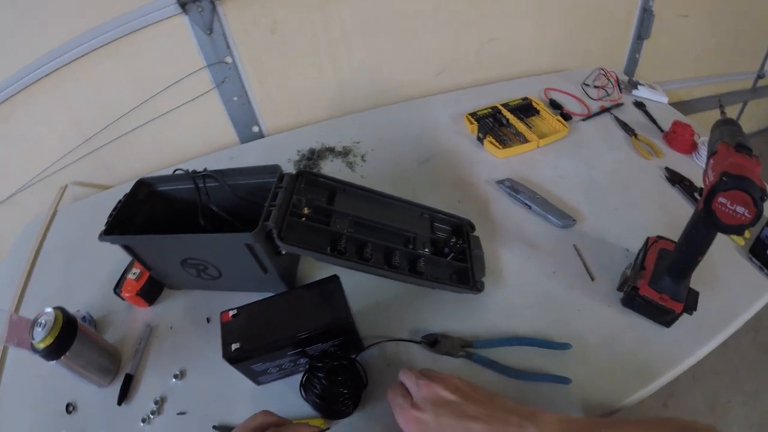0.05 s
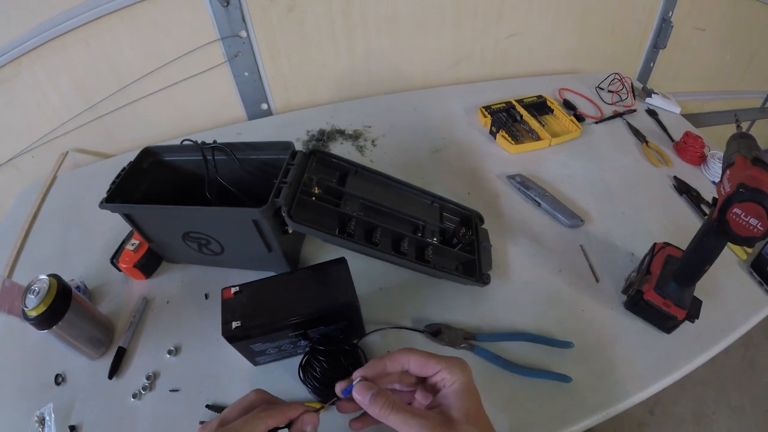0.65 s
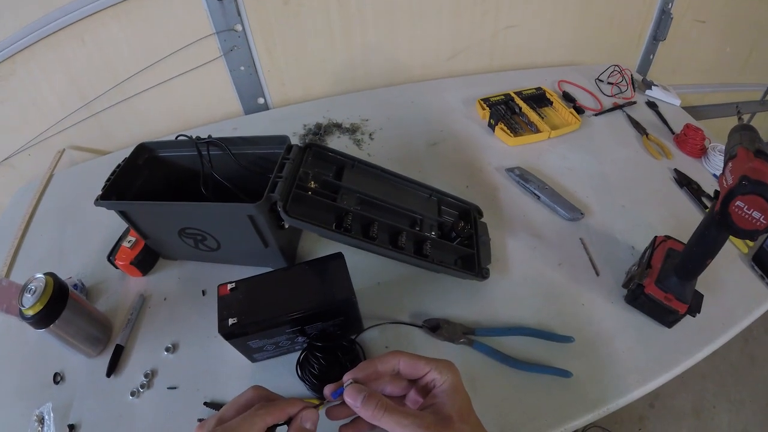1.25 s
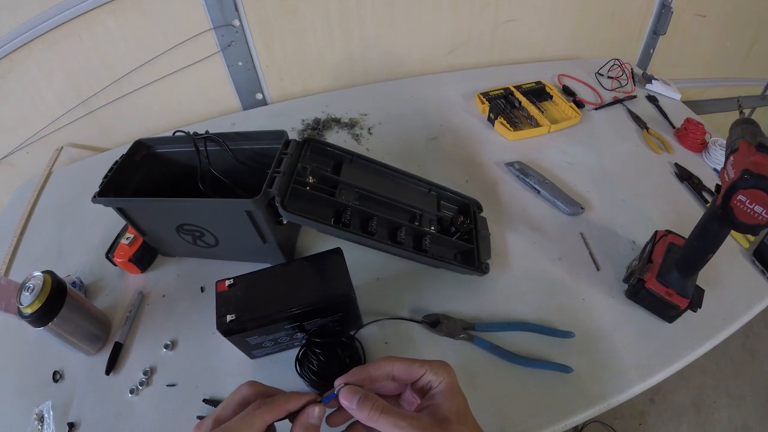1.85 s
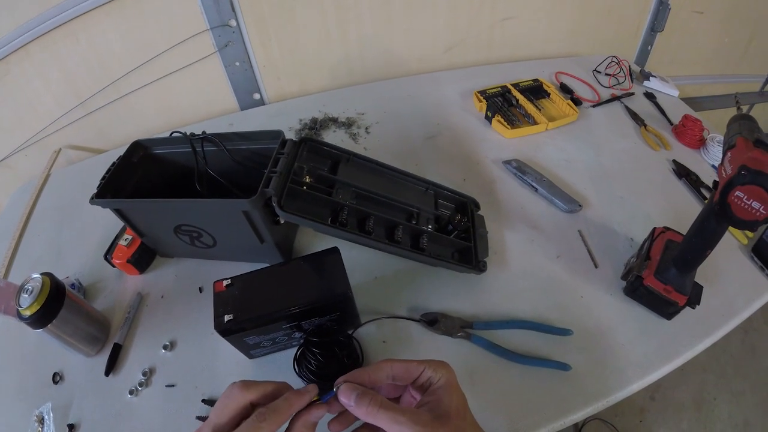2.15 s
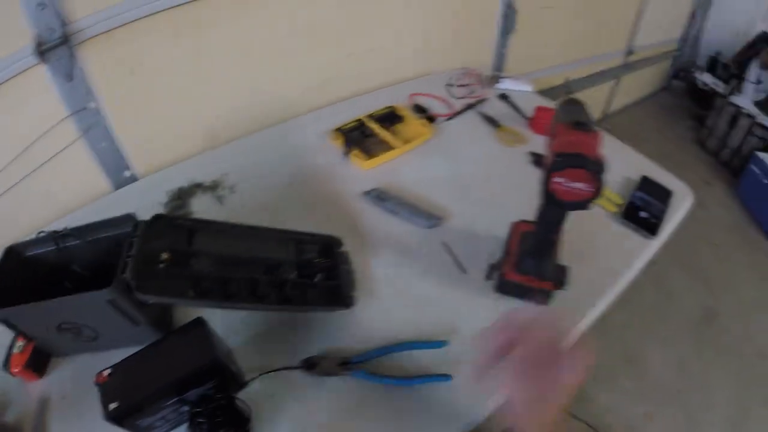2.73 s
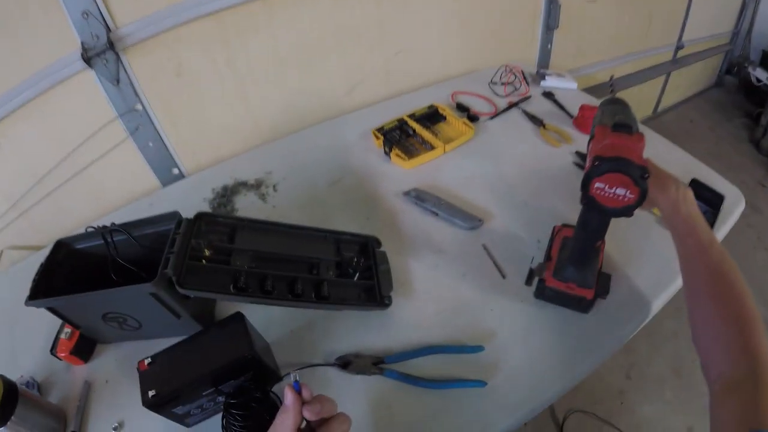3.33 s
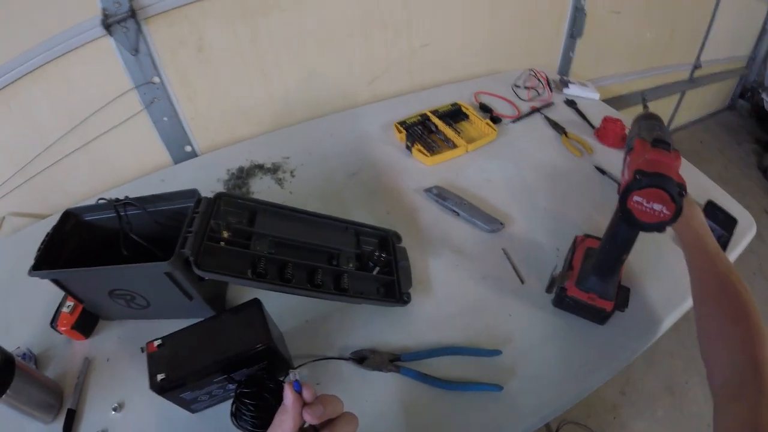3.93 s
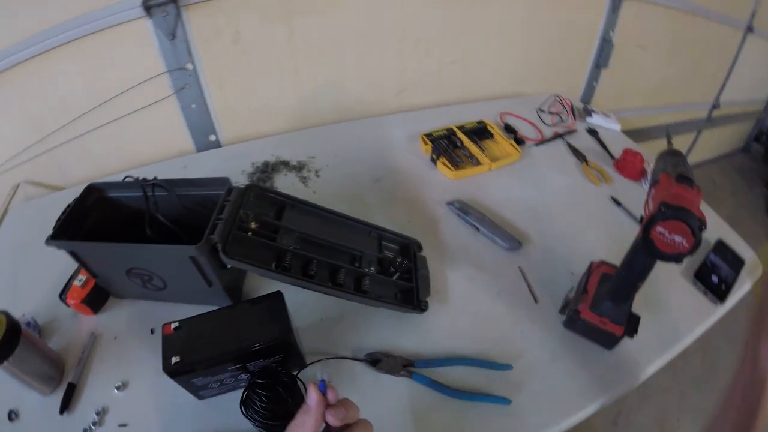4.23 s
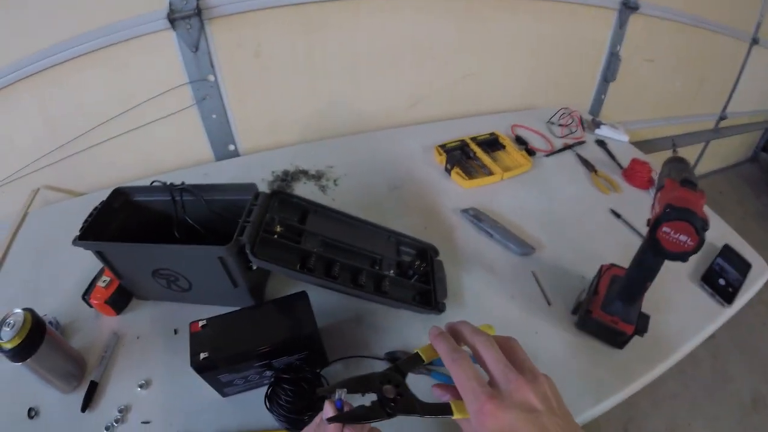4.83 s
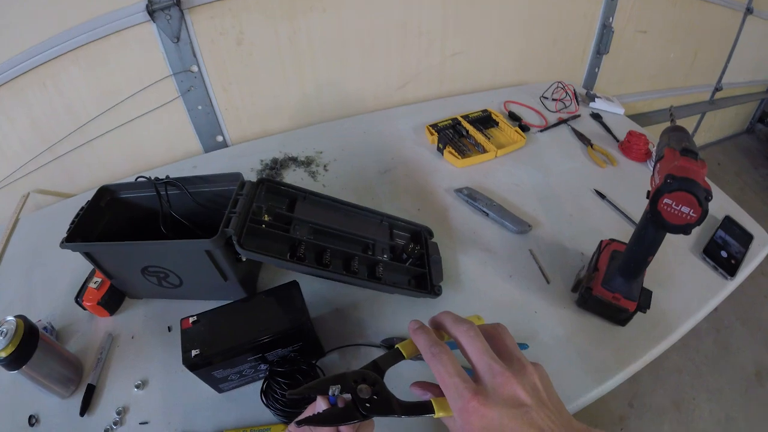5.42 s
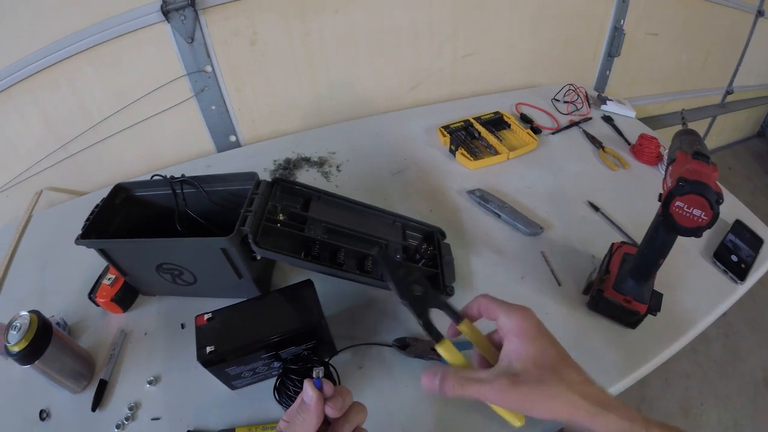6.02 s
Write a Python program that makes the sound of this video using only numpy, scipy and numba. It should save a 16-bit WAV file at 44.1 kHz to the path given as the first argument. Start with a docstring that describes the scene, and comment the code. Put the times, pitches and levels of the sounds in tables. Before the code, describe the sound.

A fan motor hums low and steady in a garage, with a soft rush of air. About halfway through, a hand bumps a plastic table and pliers are dragged out with short scrapes and small metal ticks. Something hard clacks down and rattles quickly to rest, with a slight room echo. Near the end come faint scraping and a sharp click as the pliers snap open close to the microphone.

```python
"""A fan motor hums steadily in a garage, with a rush of air. At a plastic folding table, a hand bumps
the top and drags out a pair of crimping pliers, which scrape by stick-slip friction. Something hard
clacks down, exciting the modes of the top, and rattles to rest while the room reverberates.
The steel pliers tick once on the way back and snap open after squeezing a terminal."""
import sys
import numpy as np
from scipy import signal
from scipy.fft import rfft, irfft
from scipy.io import wavfile
from scipy.ndimage import uniform_filter1d
from numba import njit

SR = 44100
rng = np.random.default_rng(int(sys.argv[2]) if len(sys.argv) > 2 else 0)


def put_to_file(sound):
    """Save the sound as 16-bit audio at rate SR, in the file named by the first command-line argument."""
    columns = np.atleast_2d(sound).T  # one column per channel
    safe = np.clip(columns, -1, 1)
    whole_steps = np.round(safe * 32767)
    wavfile.write(sys.argv[1], SR, whole_steps.astype(np.int16))


N = 272083
TIME = np.arange(N) / SR
RING_TIME = TIME[:SR // 2]


def gain(db):
    """Decibels to amplitude ratio."""
    return 10 ** (np.asarray(db) / 20)


def unit_rms(x):
    """Scale to rms 1."""
    return x / np.sqrt(np.mean(x ** 2))


def lookup(hz, points):
    """Interpolate (Hz, value) points on a log-frequency axis."""
    point_hz, value = np.transpose(points)
    return np.interp(np.log(np.maximum(hz, 1)), np.log(point_hz), value)


def colour(x, points, size=4096):
    """Minimum-phase filter with the given (Hz, dB) response, built by folding its cepstrum."""
    cepstrum = irfft(np.log(gain(lookup(np.fft.rfftfreq(size, 1 / SR), points))))
    cepstrum[1:size // 2] *= 2
    cepstrum[size // 2 + 1:] = 0
    return signal.fftconvolve(x, irfft(np.exp(rfft(cepstrum))))[:len(x)]


def tilt(x, db_per_octave):
    """Spectral slope about 1 kHz."""
    return colour(x, [(hz, db_per_octave * np.log2(hz / 1000)) for hz in (250, 16000)])


@njit
def resonate(x, hz, q):
    """Second-order band-pass resonator whose centre may move every sample."""
    y, band, low = np.empty(len(x)), 0., 0.
    for i in range(len(x)):
        g = np.tan(np.pi * hz[i] / SR)
        v = (band + g * (x[i] - low)) / (1 + g * (g + 1 / q))
        band, low, y[i] = 2 * v - band, low + 2 * g * v, v / q
    return y


def waver(rate_hz):
    """Slow random modulation of rms 1: steps smoothed twice."""
    hold = int(SR / rate_hz)
    steps = np.repeat(rng.standard_normal(N // hold + 1), hold)
    return unit_rms(uniform_filter1d(uniform_filter1d(steps, hold), hold)[:N])


def decay(t60):
    """Exponential damping, 60 dB down after t60 seconds."""
    return np.exp(-np.log(1000) * RING_TIME / t60)


def ring(modes, pitch=1):
    """Modal superposition: each blow lands elsewhere and weights the damped modes differently."""
    hz, db, t60 = np.transpose(modes)
    weights = gain(db + rng.standard_normal(len(hz))) * rng.choice([-1, 1], len(hz))
    partials = (a * np.sin(2 * np.pi * f * pitch * RING_TIME) * decay(t)
                for f, a, t in zip(hz, weights, t60))
    return sum(partials) / np.linalg.norm(weights)


def crack(spectrum, t60):
    """Modal overlap: dense, quickly dying modes merge into a noise burst of set energy."""
    phase = np.angle(rfft(rng.standard_normal(len(RING_TIME)) * decay(t60)))
    flat = irfft(np.exp(1j * phase), len(RING_TIME))
    burst = colour(flat * decay(10 * t60), spectrum)
    return burst * np.linalg.norm(decay(t60)) / np.linalg.norm(burst)


def add(track, start_s, sound):
    """Mix a sound into the track."""
    start = int(start_s * SR)
    track[start:start + len(sound)] += sound[:N - start]


# Motor hum. Each row: multiple of the shaft rate, rms level in dB, waver in dB.
SHAFT_HARMONICS = [(1, -22.5, 0.28), (2, -41, 1.5), (3, -53, 1.1), (4, -43.5, 0.8), (6, -68.5, 3.6)]
# Rushing air. Each row: frequency in Hz, relative spectral density in dB.
AIR_SPECTRUM = [(25, 2.5), (70, -1), (130, -4.5), (210, -6), (300, -11), (550, -14), (700, -19),
                (950, -17.5), (1300, -23), (2100, -28.5), (3800, -30.5), (4600, -50), (15000, -82)]

def fan(shaft_hz=57.84, panel_hz=251.7, panel_db=-53, air_db=-40, flutter_db=.5):
    """Periodic rotation gives harmonics of the shaft rate, over a droning panel and broadband air."""
    turns = shaft_hz * TIME + 0.0019 * waver(8.5)
    hum = sum(gain(db + waver_db * waver(8.4)) * np.sin(2 * np.pi * (multiple * turns + rng.random()))
              for multiple, db, waver_db in SHAFT_HARMONICS)
    panel_phase = 2 * np.pi * panel_hz * TIME
    panel = waver(9) * np.sin(panel_phase) + waver(8) * np.cos(panel_phase)
    air = unit_rms(colour(rng.standard_normal(N), AIR_SPECTRUM))
    air *= gain(air_db + flutter_db * waver(8.6))
    return np.sqrt(2) * hum + gain(panel_db) * panel + air


# Decay of the room. Each row: frequency in Hz, reverberation time in seconds.
GARAGE_T60 = [(120, 0.9), (500, 0.5), (1200, 0.69), (3000, 0.54), (5500, 0.57), (12000, 0.32)]
# Colour of the echoes. Each row: frequency in Hz, gain in dB.
GARAGE_SPECTRUM = [(100, -18), (170, 3), (270, -1), (480, 4.5), (750, 0.5), (1200, -3.5), (2200, -2),
                   (3500, 0.5), (4700, -5), (6300, -0.5), (10500, 1), (13000, 2)]

def garage(x, wet_db=-37, build_s=0.0025):
    """Diffuse reverberation: echoes build up from the nearest walls, and the treble dies first."""
    n = len(RING_TIME)
    hz = np.fft.rfftfreq(n, 1 / SR)
    spectrum = rfft(rng.standard_normal(n)) * gain(lookup(hz, GARAGE_SPECTRUM))
    octave = np.round(np.log2(np.maximum(hz, 64)))
    tail = sum(irfft(spectrum * (octave == k), n) * decay(lookup(2 ** k, GARAGE_T60))
               for k in np.unique(octave))
    build_up = 1 - np.exp(-(RING_TIME / build_s) ** 2)
    return gain(wet_db) * signal.fftconvolve(x, tail * build_up)[:N]


# Sliding contacts. Each row: start in seconds, length in seconds, nominal level in dB,
# slope in dB per octave, first and last contact resonance in Hz.
SLIDE_STROKES = [(3.119, 0.018, -47, 1, 1100, 1900), (3.132, 0.058, -50, -1.5, 400, 600),
                 (3.237, 0.055, -37.5, -4.5, 1500, 1680), (3.56, 0.069, -38.5, -11.5, 300, 300),
                 (3.836, 0.041, -41.5, -0.5, 1690, 750), (5.392, 0.52, -54, -4.5, 910, 1400),
                 (5.484, 0.18, -50, -4, 950, 1250), (5.961, 0.14, -51.5, -5, 900, 1200)]
# Colour of the friction. Each row: frequency in Hz, relative level in dB.
FRICTION_SPECTRUM = [(250, -22.5), (600, -10), (850, -6.5), (1100, -0.5), (1400, -4.5), (1850, -5),
                     (2250, -14), (3800, -14.5), (5000, -34), (14000, -51)]

def slides(slips_per_s=2000, scatter_db=5, uneven_db=2, contact_q=1.7, contact_db=-4):
    """Stick-slip friction: uneven catches drive a resonance that glides as the contact moves."""
    out = np.zeros(N)
    for start_s, length_s, db, slope, start_hz, end_hz in SLIDE_STROKES:
        n = int(length_s * SR)
        catches = (rng.random(N) < slips_per_s / SR) * rng.choice([-1, 1], N)
        catches = catches * gain(scatter_db * rng.standard_normal(N))
        scrape = unit_rms(tilt(colour(catches[:n], FRICTION_SPECTRUM), slope))
        contact = unit_rms(resonate(scrape, np.geomspace(start_hz, end_hz, n), contact_q))
        pressure = np.hanning(n) ** 0.13
        add(out, start_s, gain(db) * unit_rms(scrape + gain(contact_db) * contact) * pressure)
    return out * gain(uneven_db * waver(40))


SNAP_DB = -20  # strength of a full snap of the pliers
# Steel jaws and pivot. Each row: frequency in Hz, relative level in dB, t60 in seconds.
PIVOT_MODES = [(844, -13, 0.048), (1364, -8, 0.064), (3373, -9, .012), (3230, -21, 0.011),
               (3681, -28, 0.0197), (4000, -2, 0.021), (6450, -19, 0.014), (6200, -2.5, 0.01),
               (7800, 1, 0.012), (10070, -17, 0.0127), (10400, -1, 0.012)]
# Crack of steel on steel. Each row: frequency in Hz, relative spectral density in dB.
PIVOT_CRACK = [(1200, -9.5), (2600, -5.5), (3400, 10), (4200, -6.5), (5200, -13), (6300, 1), (7700, -6),
               (9000, -9), (12500, -8), (15000, -35)]

def pivot(db, crack_db=-4.5, ring_db=-6, slope_per_db=0.524):
    """Damped impact: a harder contact is brighter, and the gripping hand soon absorbs the ringing."""
    slope = slope_per_db * min(db - SNAP_DB, 0)
    tick = gain(ring_db) * ring(PIVOT_MODES) + gain(crack_db) * crack(PIVOT_CRACK, t60=0.021)
    return gain(db - 2 * slope) * tilt(tick, slope)  # the slope turns about 4 kHz


# Jaw tips and opening spring. Each row: frequency in Hz, relative level in dB, t60 in seconds.
TIP_MODES = [(5180, -1, 0.019), (6300, 2, 0.014), (9960, -5.5, 0.017)]
OPENING_SPRING_MODES = [(3160, -2, .2), (3480, -6, .22), (3520, -5, .22), (3700, 4, 0.26), (4000, -3, 0.22)]
# Ticks of the pliers. Each row: start in seconds, strength in dB, jaw tips' share from 0 to 1.
PLIER_TICKS = [(3.536, -37.5, 0.37), (3.559, -30.5, 0.47), (3.612, -31.5, 0.06), (3.633, -28.5, 0.1),
               (4.589, -31, 0.82), (5.863, -21, 0.26)]

def pliers(spring_db=-26, rebound_s=.009, rebound_db=-8):
    """Mechanical play: a tick rings tips, pivot and spring, then the loose pivot rebounds once."""
    out = np.zeros(N)
    for start_s, db, tip_share in PLIER_TICKS:
        joint = pivot(db) + gain(db + spring_db) * ring(OPENING_SPRING_MODES)
        tips = gain(db) * ring(TIP_MODES) / 2
        add(out, start_s, (1 - tip_share) * joint + tip_share * tips)
        delay_s = rebound_s * gain(db - SNAP_DB) ** 0.45  # weaker ticks return sooner
        add(out, start_s + delay_s, (1 - tip_share) * gain(rebound_db) * pivot(db))
    return out


# Hard ring and slow bending of the top. Each row: frequency in Hz, relative level in dB, t60 in seconds.
TOP_RING_MODES = [(760, -13.5, 0.12), (1055, -16, 0.09), (1172, 3, 0.043), (1267, -4, 0.028),
                  (1410, -11, 0.07), (1486, -6, 0.035), (1770, -8, 0.03), (2130, -8.5, 0.026),
                  (2406, -6.5, 0.03), (2700, -6, 0.027), (3370, -6, 0.022), (3720, -11, 0.022),
                  (4250, -9, .02), (6230, -18, 0.018)]
TOP_BENDING_MODES = [(130, 4.5, 0.19), (152.5, -4.5, 0.17), (200, -13, 0.078), (263.5, -2, 0.16),
                     (300, -3.5, 0.08), (396, -3, 0.057), (482, -13, 0.066), (565, -10, 0.046),
                     (690, -9.5, 0.059)]
# Brief crack of the top. Each row: frequency in Hz, relative spectral density in dB.
TOP_CRACK = [(300, -23), (430, -11), (580, -20), (780, -38), (930, -12), (1200, 4), (1600, 7), (2100, 3.5),
             (2700, -2.5), (3050, -3), (3400, -2), (4300, -2.5), (5100, -11), (6300, -10.5), (8200, -30),
             (12000, -29), (15000, -54)]
# Blows on the top. Each row: start in seconds, clack strength in dB, hardness from 0 (palm) to
# 1 (bare edge), clack pitch factor, bending strength in dB, bending pitch factor.
TABLE_BLOWS = [(3.127, -37, .15, .9, -14.5, 1.1), (3.162, -34, 0.17, 0.5, -21, 1.1),
               (3.559, -30, 1, 0.95, -23, 1), (3.629, -7.5, 0.57, 1, -9.5, 1),
               (3.658, -18, 0.28, 1.1, -27, .95), (3.667, -21, 0.23, 0.89, -35, 1),
               (3.724, -34, .3, 1.06, -44, 1), (3.774, -28, 0.3, 0.92, -41, 1), (3.828, -34, .3, 1, -48, 1)]

def table(crack_db=-8, ring_db=-1, thud_db=-3, flex_s=0.0043, full_hardness=0.574, soft_slope=-9):
    """Impact excitation: the top clacks at once, then bends; a softer, longer contact loses treble."""
    out = np.zeros(N)
    for start_s, clack_db, hardness, pitch, bend_db, bend_pitch in TABLE_BLOWS:
        clack = gain(ring_db) * ring(TOP_RING_MODES, pitch)
        clack += gain(crack_db) * crack(TOP_CRACK, t60=0.018)
        softness = np.clip(1 - hardness / full_hardness, 0, 1)
        clack = tilt(clack, soft_slope * softness)
        thud = ring(TOP_BENDING_MODES, bend_pitch) * (1 - np.exp(-RING_TIME / flex_s))
        add(out, start_s, gain(clack_db) * clack + gain(bend_db + thud_db) * thud)
    return out


def scene(pliers_room_db=-9):
    """Direct-to-reverberant ratio: the pliers are close, so less of the room comes with them."""
    far, near = table() + slides(), pliers()
    return (fan() + far + near + garage(far + gain(pliers_room_db) * near))[None]


# Microphone hiss. Each row: frequency in Hz, relative spectral density in dB.
HISS_SPECTRUM = [(4000, -4.5), (5800, -5), (6250, -1), (8500, -3), (12000, -8), (15000, -17.5)]

def record(dry, hiss_db=-66, cutoff_hz=15100):
    """Self-noise and limited bandwidth: the microphone adds hiss and cuts the highest treble."""
    hiss = gain(hiss_db) * unit_rms(colour(rng.standard_normal(N), HISS_SPECTRUM))
    low_pass = signal.ellip(8, .2, 70, cutoff_hz, fs=SR, output="sos")
    return signal.sosfilt(low_pass, dry + hiss)


dry = scene()
out = record(dry)
put_to_file(out)
```